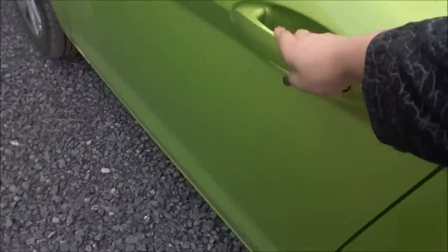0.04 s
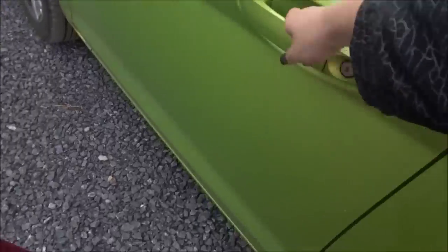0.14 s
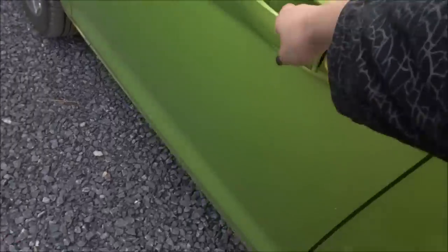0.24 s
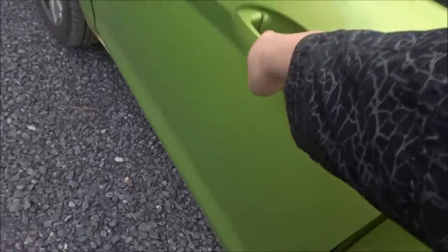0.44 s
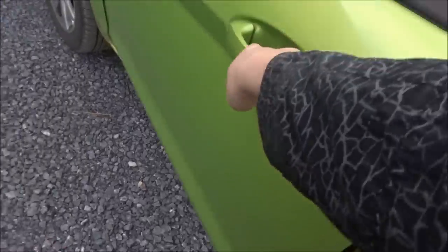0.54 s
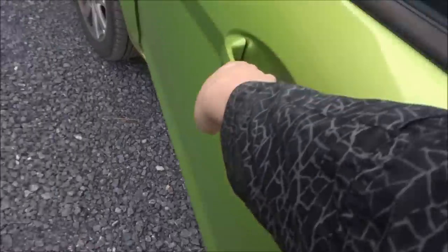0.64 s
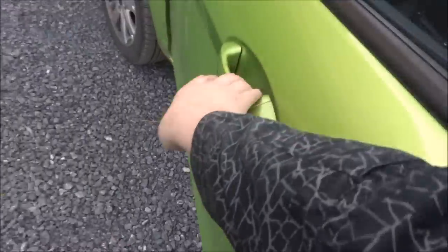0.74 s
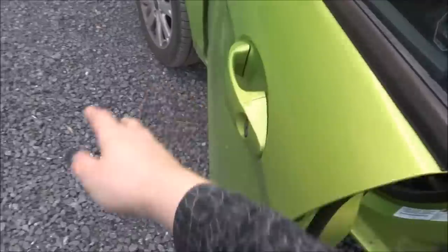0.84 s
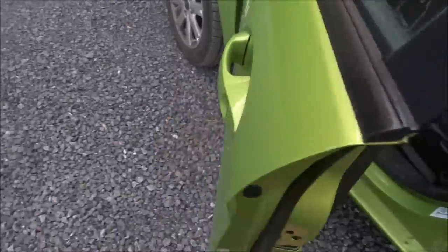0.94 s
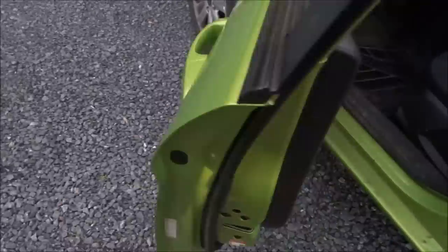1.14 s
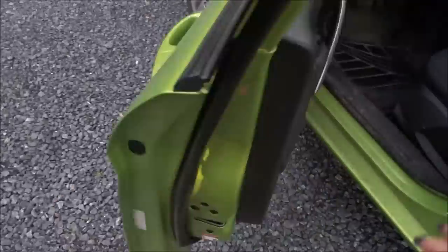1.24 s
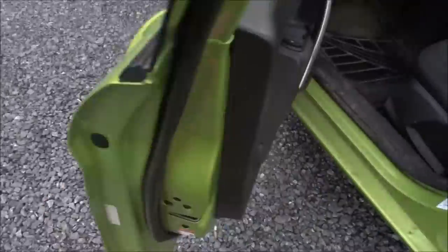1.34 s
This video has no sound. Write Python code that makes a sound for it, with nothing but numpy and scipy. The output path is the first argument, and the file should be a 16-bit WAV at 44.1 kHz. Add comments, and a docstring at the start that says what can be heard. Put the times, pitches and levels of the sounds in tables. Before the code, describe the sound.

A car door is opened by hand outdoors, heard close up: sleeve rustle and creaking, quick linkage knocks and a dull latch thump, a tiny squeak, a pause, then a sharp handle clunk and soft air puffs on the microphone.

```python
"""A quiet outdoor floor and low gusty rumble open, with sleeve rustle, faint creaking, a tick and a puff of air.
Then, close to the phone, a hand pulls a car door handle: linkage knocks, a dull latch thump, a peeling rubber seal,
a short squeak, the sharp clunk of the handle snapping back, and air puffs as the door swings open.
Force pulses and slips ring decaying modes; noise bands make floor, rumble, cloth and rattle; a broken sine squeaks;
filtered noise bursts tick; short low sine cycles make the puffs on the microphone."""
import sys
import numpy as np
from scipy import signal
from scipy.io import wavfile
from scipy.ndimage import uniform_filter1d, map_coordinates

SR = 44100
rng = np.random.default_rng(int(sys.argv[2]) if len(sys.argv) > 2 else 0)


def dump(signal):
    """Clip the signal to [-1, 1] and save it as 16-bit WAV at the path in sys.argv[1]."""
    limited = np.clip(np.atleast_2d(signal).T, -1, 1)
    pcm = np.round(limited * 32767).astype(np.int16)
    wavfile.write(sys.argv[1], SR, pcm)


def volts_from_db(level):
    """Convert decibel levels to linear amplitude ratios."""
    exponent = np.asarray(level, float) / 20
    return 10 ** exponent


N = 61739
T = np.arange(N) / SR  # time, s

# steady outdoor floor, relative spectrum: pitch_hz, density_db (per Hz)
FLOOR_COLOUR = [(100, 4.5), (350, -7.5), (700, -17), (1500, -37), (4000, -37), (11000, -52)]
# gusty wind rumble, level before its wander: time_s, level_db
RUMBLE_LEVEL = [(0, -47), (.12, -55.5), (.31, -39), (.4, -49), (.7, -54.5), (.96, -63), (1.15, -44.5),
                (1.4, -53)]
# stereo width of diffuse sound: pitch_hz, side_over_mid_db (before each source's own offset)
WIDTH = [(60, -14), (600, -9), (1800, -4), (5000, 1)]
# sleeve rubbing, level before tilt and flicker: time_s, level_db
SLEEVE_LEVEL = [(0, -61.5), (.2, -56), (.36, -57.5), (.42, -67.5), (.7, -71.5), (.9, -59), (1.0, -57),
                (1.06, -51.5), (1.14, -50.5), (1.25, -56), (1.3, -70.5), (1.4, -65.5)]
# cloth hiss, relative spectrum: pitch_hz, density_db (per Hz)
CLOTH_COLOUR = [(500, -13), (1100, -3), (2200, -6), (3500, -10), (5200, -19.5), (11000, -28.5)]
# door panel modes: pitch_hz, level_db, t60_s
DOOR_MODES = [(120, -1, 0.15), (160.8, -2, 0.11), (218.7, 1.5, 0.072), (294, 3, 0.048),
              (374.4, -2.5, 0.048), (438, -5, 0.061), (542.4, -5, 0.058), (639.3, -2.5, 0.062),
              (829, -11.5, 0.049)]
# strain on hinge and seal, heard as creaking in the panel: time_s, level_db
STRAIN_LEVEL = [(0, -52), (.12, -56), (.2, -48.5), (.29, -34), (.4, -34), (.43, -49.5), (.65, -53.5),
                (.78, -55), (.88, -44), (1.0, -60), (1.4, -90)]
# small dry ticks: start_s, level_db, centre_hz, width_hz (of the first, narrowest filter)
TICK_EVENTS = [(.0075, -45.5, 1170, 497), (0.5471, -54.5, 4870, 6000), (0.579, -43, 790, 294),
               (0.7088, -54, 3700, 2980), (0.9031, -46, 1710, 1170), (1.1247, -39, 6900, 7800),
               (1.2690, -42.5, 874, 700), (1.3808, -54.5, 4720, 1520)]
# air puffs on the microphone, before the left-right tilt: start_s, level_db, starting_pitch_hz, decay_cycles
PUFF_EVENTS = [(.016, -29.5, 138, 0.88), (.660, -29, 79, 0.73), (1.051, -29.5, 119, 1.9),
               (1.074, -30.5, 268, 2.6), (1.089, -24, 170, 1.13), (1.108, -35, 126, 0.94),
               (1.131, -22, 170, 0.36), (1.137, -16, 202, 0.94), (1.180, -34.5, 147, 2.7),
               (1.310, -30.5, 90, 1.65), (1.354, -25.5, 205, 1.21), (1.369, -35.5, 120, 1.4)]
# handle and latch parts' modes: pitch_hz, level_db, t60_s
HANDLE_MODES = [(960, -22, 0.071), (1255, -0.5, 0.085), (2050, -1, 0.04), (3130, 1.5, 0.011),
                (3220, 0, 0.022), (4420, -13, 0.011), (5360, 2, 0.005)]
# blows in the mechanism: start_s, door_force_db, handle_force_db, door_contact_ms
BLOW_EVENTS = [(.2150, -40, -50, 0.16), (0.2195, -32, -68, 2.45), (.2495, -33.5, -47, 1.13),
               (0.261, -48, -40.5, 0.13), (.2685, -28, -68, 1.88), (.3045, -24.5, -39, 1.08),
               (.3085, -41.5, -44, 0.76), (.3125, -57, -47, 0.31), (0.3159, -17, -43, 1.85),
               (0.3200, -29.5, -44.5, 0.58), (.3265, -36, -75, 0.73), (.3370, -33, -53.5, 0.31),
               (.3520, -26, -75, 1.7), (.3680, -29.5, -46.5, 2.07), (.3820, -45.5, -48, 1.1),
               (.4490, -43.5, -55.5, 1.1), (.8160, -62, -28, 0.1), (.8195, -31, -32.5, 0.73),
               (0.8263, -25, -35, 0.89), (.8400, -27.5, -41, 1.56), (0.847, -48, -41, 0.38),
               (1.0760, -36.5, -99, 1.37)]
# loose-part rattle, relative spectrum: pitch_hz, density_db (per Hz)
RATTLE_COLOUR = [(300, -6), (1100, -10), (2000, -20), (3200, -22.5), (11000, -39.5)]
# squeaky rub in the linkage, before its waver: time_s, pitch_hz, level_db
SQUEAK_PATH = [(.357, 1730, -51), (.397, 1550, -60)]


def curve(table, col=1):
    """A table column over time."""
    rows = np.array(table)
    return np.interp(T, rows[:, 0], rows[:, col])


def unit(x):
    """Scale to rms 1."""
    return x / np.sqrt(np.mean(x ** 2))


def band(x, hz, width):
    """Resonant band-pass, centre and width in Hz."""
    centre = min(hz, 0.4 * SR)
    b, a = signal.iirpeak(centre, hz / min(width, 0.3 * SR), SR)
    return signal.lfilter(b, a, x)


def walk(rate):
    """Slow smoothed chance of rms 1, from `rate` draws a second."""
    hold = max(int(SR / rate), 2)
    steps = np.repeat(rng.standard_normal(N // hold + 1), hold)
    smooth = uniform_filter1d(uniform_filter1d(steps, hold), hold)
    return unit(smooth[:N])


def at(table, hz):
    """Read a spectrum on a log frequency axis."""
    rows = np.array(table)
    return np.interp(np.log(hz), np.log(rows[:, 0]), rows[:, 1])


def band_noise(hz):
    """Third-octave noise of rms 1."""
    return unit(band(band(rng.standard_normal(N), hz, hz / 3), hz, hz / 2))


def diffuse(colour, lo_hz, shape, side_db=0):
    """Third-octave stereo noise bands; shape(hz) is each band's gain over time."""
    out = 0
    centres = lo_hz * 2 ** np.arange(0, np.log2(12000 / lo_hz), 1 / 3)
    weights = volts_from_db(at(colour, centres)) * np.sqrt(centres)  # density times bandwidth
    weights = weights / np.sqrt(np.sum(weights ** 2))
    for hz, weight in zip(centres, weights):
        mid = band_noise(hz)
        side = volts_from_db(at(WIDTH, hz) + side_db) * band_noise(hz)
        out = out + weight * shape(hz) * (mid + side * np.array([[1], [-1]]))
    return out


def push(s, db, ms):
    """A smooth contact force: a squared half sine, its sum set by db."""
    u = (T - s) / (ms / 1000)
    pulse = np.where((u > 0) & (u < 1), np.sin(np.pi * u) ** 2, 0)
    return volts_from_db(db) * pulse / max(pulse.sum(), 1e-9)


def ring(force, modes):
    """Force rings a set of exponentially decaying sine modes."""
    out = 0
    for hz, db, t60 in modes:
        pole = np.exp(2j * np.pi * hz / SR - np.log(1000) / (t60 * SR))
        out = out + volts_from_db(db) * signal.lfilter([1], [1, -pole], force).imag
    return out


def panel(force, modes):
    """The door skin rings; it radiates poorly below 170 Hz."""
    b, a = signal.butter(2, 170, "high", fs=SR)
    return signal.lfilter(b, a, ring(force, modes))


def outdoors():
    """Steady noise floor and low wind rumble whose level wanders in gusts."""
    floor_db = -52.5
    floor = diffuse(FLOOR_COLOUR, 98.8, lambda hz: volts_from_db(floor_db + 0.18 * walk(13)))
    gust_db = curve(RUMBLE_LEVEL) + 3.6 * walk(14.33)
    rumble_colour = [(25, 0.5), (70, -1), (120, -7.0), (300, -47.5)]  # pitch_hz, density_db
    return floor + diffuse(rumble_colour, 24.6, lambda hz: volts_from_db(gust_db), 0.87)


def sleeve():
    """Cloth friction hisses, brighter when faster, with flickering bands and a patchy narrow zip of ribbed weave."""
    brighten, neutral_db = 0.19, -58.5  # dB per octave of tilt for each dB over the neutral level
    weave_hz, weave_width_hz, weave_db = 2270, 390, -11  # weave level is relative to the sleeve curve
    db, shared = curve(SLEEVE_LEVEL), walk(39.36)
    tilt = brighten * (db - neutral_db)
    zip_noise = unit(band(rng.standard_normal(N), weave_hz, weave_width_hz))
    weave = zip_noise * volts_from_db(db + weave_db + 3.4 * walk(11.9))

    def flicker(hz):
        return volts_from_db(db + tilt * np.log2(hz / 2500) + 1.2 * shared + 2.2 * walk(40))

    return weave + diffuse(CLOTH_COLOUR, 500, flicker)


def creak():
    """Irregular soft slips of rubber and hinge drive the panel."""
    slips_per_s, spread_db = 400, 3
    chance = rng.random((3, N))
    happens = chance[0] < slips_per_s / SR
    size = volts_from_db(-spread_db * np.log(chance[1] + 1e-9))
    slips = happens * size * np.sign(chance[2] - 0.5)
    soft = np.convolve(slips, np.hanning(42), "same")  # softened over 42 samples
    return unit(panel(soft, DOOR_MODES)) * volts_from_db(curve(STRAIN_LEVEL))


def ticks():
    """Brief decaying noise crackles, each through its own resonance."""
    decay_ms = 1.2  # of the crackle, before its resonance
    out, sign = 0, np.sign(rng.standard_normal(N))
    for s, db, hz, width in TICK_EVENTS:
        crackle = sign * (T > s) * np.exp(-np.clip(T - s, 0, 1) * 1000 / decay_ms)
        click = band(crackle, hz, width)
        click = band(band(click, hz, 2 * width), hz, 2 * width)
        # level is the rms if all the energy lay within decay_ms
        out = out + volts_from_db(db) * click * np.sqrt(decay_ms * SR / 1000 / np.sum(click ** 2))
    return out


def puffs():
    """Pushed air makes a few low cycles that swell, fade and sag in pitch, stronger on left and right in turn."""
    pan_db = 6.5  # level difference between the ports
    out = 0
    for k, (s, db, hz, cycles) in enumerate(PUFF_EVENTS):
        c = np.clip(T - s, 0, 0.3) * hz  # cycles since the start, before the sag
        swell = 1 - np.exp(-(c / 0.27) ** 2)
        fade = np.exp(-(c / cycles) ** 1.19)
        wave = np.sin(2 * np.pi * c * (1 - 0.027 * c)) * swell * fade
        tilt_db = (-1) ** k * pan_db * np.array([[0.5], [-0.5]])
        out = out + volts_from_db(db + tilt_db) * wave
    return out


def mechanism():
    """Contact blows ring the door panel and the handle and latch parts."""
    plate_share = 0.51  # the small hard parts feel this share of a contact's length
    door_force = sum(push(s, db, ms) for s, db, _, ms in BLOW_EVENTS)
    handle_force = sum(push(s, db, plate_share * ms) for s, _, db, ms in BLOW_EVENTS)
    return -panel(door_force, DOOR_MODES) + ring(handle_force, HANDLE_MODES)


def rattle():
    """Loose parts shake on in a dense noise tail after every blow; soft blows leave the treble out."""
    level_db, side_db = 7, -5
    t60_s, t60_tilt = 0.07, 0.11  # decay at 1 kHz, and how fast it shortens with pitch
    soft_cycles = 3.5  # contacts longer than this many cycles of a band hardly shake it
    contact_s = np.array(BLOW_EVENTS)[:, 3] / 1000
    power = np.array([push(s, db, 0.94) ** 2 for s, _, db, _ in BLOW_EVENTS]) * (SR / 1500)

    def tail(hz):
        hardness = 1 / (1 + (hz * contact_s / soft_cycles) ** 2)
        decay = np.exp(-2 * np.log(1000) * (hz / 1000) ** t60_tilt / (t60_s * SR))
        return np.sqrt(signal.lfilter([1], [1, -decay], hardness @ power))

    return volts_from_db(level_db) * diffuse(RATTLE_COLOUR, 292.4, tail, side_db)


def squeak():
    """Fast stick-slip in the linkage: a wavering, broken tone that sags as the rub slows."""
    hz = curve(SQUEAK_PATH) * (1 + 0.05 * walk(500))
    inside = 1.0 * (T > SQUEAK_PATH[0][0]) * (T < SQUEAK_PATH[-1][0])
    gate = uniform_filter1d(inside, 200)
    level = volts_from_db(curve(SQUEAK_PATH, col=2) + 4 * walk(250))
    return np.sin(2 * np.pi * np.cumsum(hz) / SR) * level * gate


def scene():
    """Car and sleeve lie a little to the right, reaching the left port later and weaker; air and floor surround."""
    lag_s, pan_db = 4.2e-5, -1.5  # left against right
    centred = creak() + ticks() + mechanism() + squeak()
    car = np.array([1, 1])[:, None] * centred + rattle() + sleeve()
    car[0] = map_coordinates(car[0], [(T - lag_s) * SR], mode="nearest")
    placed = car * volts_from_db(np.array([[pan_db / 2], [-pan_db / 2]]))
    return placed + puffs() + outdoors()


def band_limit(x):
    """A steep low-pass at the top of the band."""
    return signal.sosfilt(signal.butter(12, 11730, fs=SR, output="sos"), x)


def record(dry):
    """The phone cuts the top steeply above 11150 Hz."""
    low_pass = signal.ellip(10, 0.2, 75, 11150, fs=SR, output="sos")
    finished = signal.sosfilt(low_pass, dry)
    return band_limit(finished)


dry = scene()
out = record(dry)
dump(out)
```